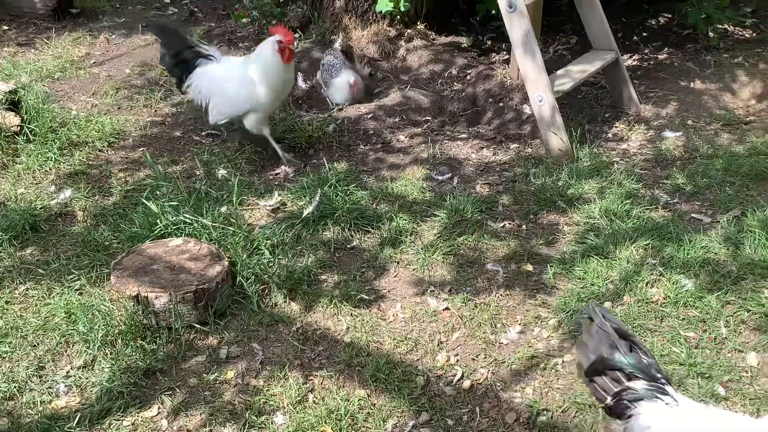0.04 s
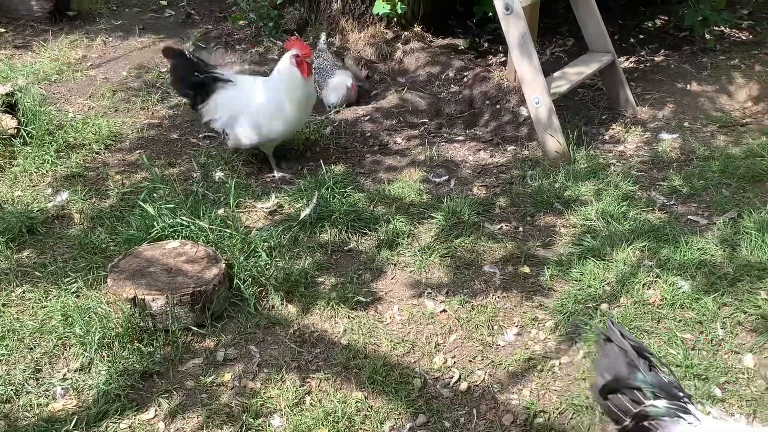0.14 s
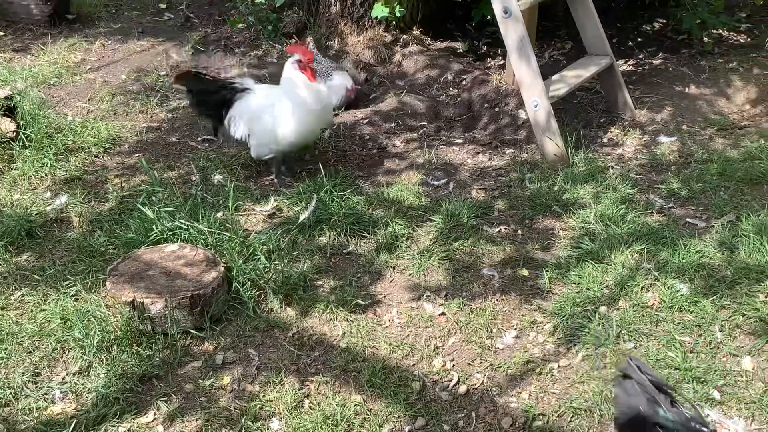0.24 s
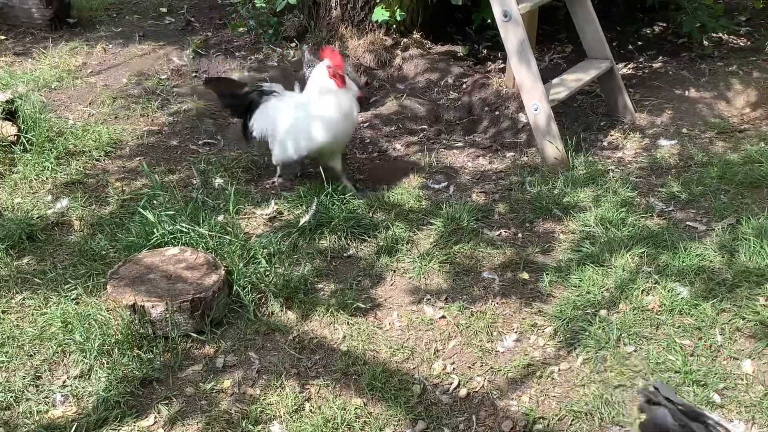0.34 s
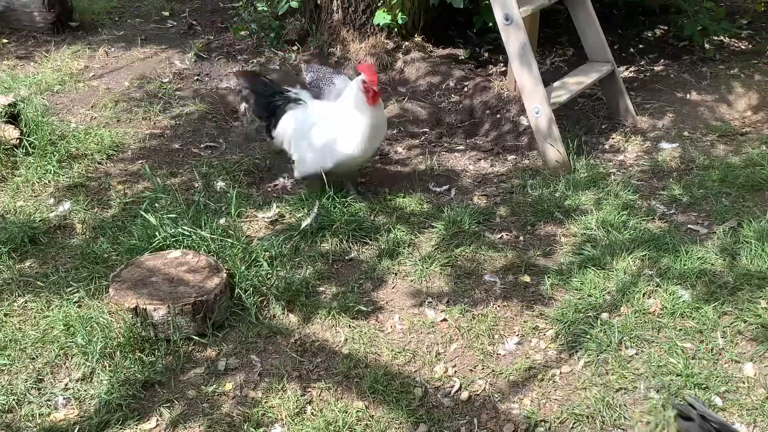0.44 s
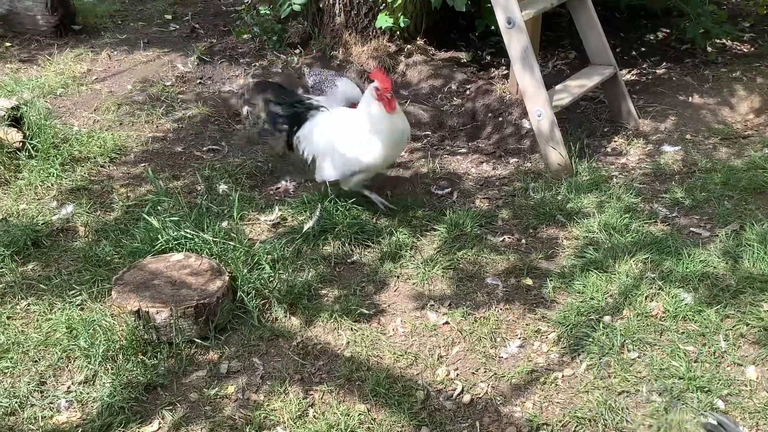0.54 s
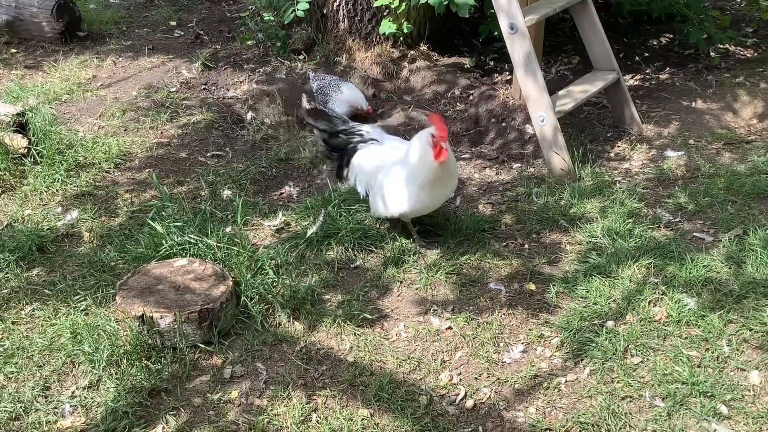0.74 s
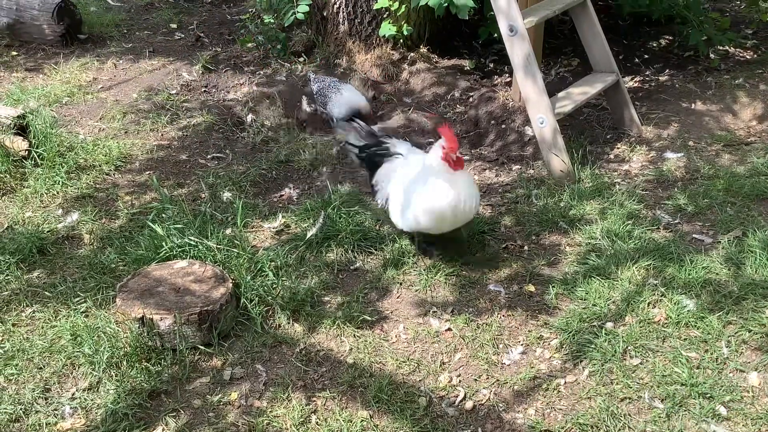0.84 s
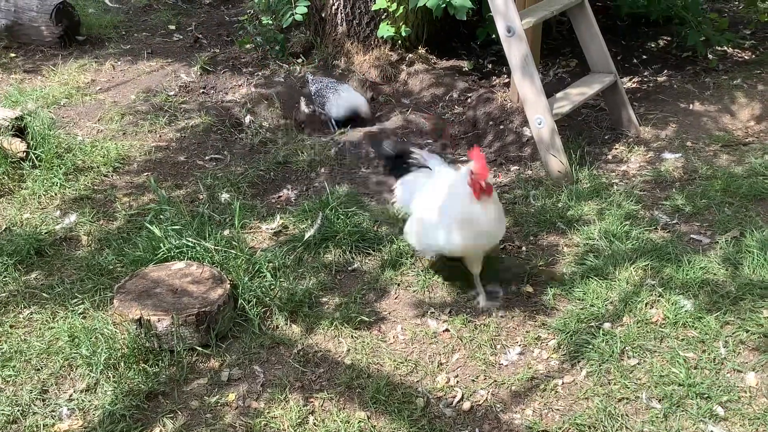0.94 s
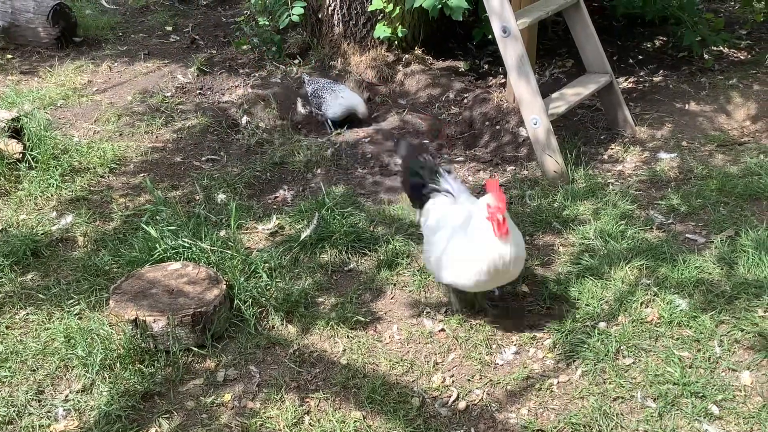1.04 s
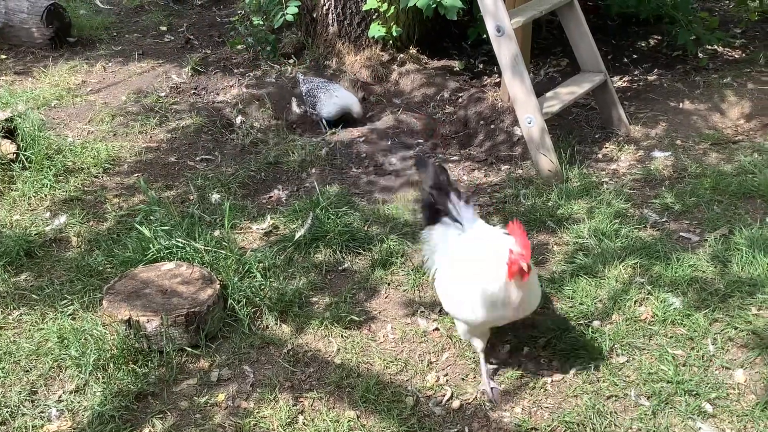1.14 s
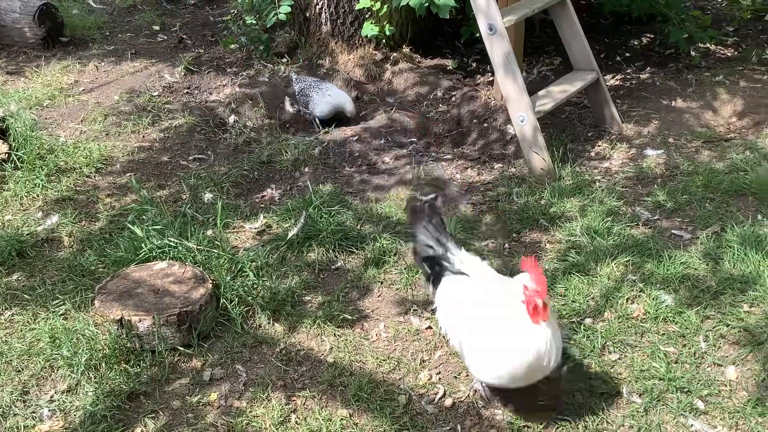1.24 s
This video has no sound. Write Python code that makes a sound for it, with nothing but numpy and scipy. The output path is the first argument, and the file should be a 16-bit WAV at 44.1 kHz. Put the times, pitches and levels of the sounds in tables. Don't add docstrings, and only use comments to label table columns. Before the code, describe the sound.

Chickens clucking in a grass pen. A soft cluck at 0.08 s, then a near hen's loud raspy squawks at 0.19, 0.37 and 0.57 s, the first longest and brightest, the last very short and muffled. Quiet clucks follow at 0.65, 0.81, 0.89, 1.10 and 1.28 s. Leaves crackle faintly near 1.0 s; a distant hen calls at 1.25 s. Faint hum, hiss and late-rising traffic rumble lie beneath, with short dull echoes.

```python
import sys
import numpy as np
from scipy import signal
from scipy.io import wavfile
from scipy.ndimage import uniform_filter1d

SR = 44100
rng = np.random.default_rng(int(sys.argv[2]) if len(sys.argv) > 2 else 0)


def to_linear_factor(level_db):
    exponent = np.asarray(level_db, float) / 20
    return 10 ** exponent


def store_pcm(level_fs):
    pcm = np.round(np.clip(level_fs, -1, 1) * 32767).astype(np.int16)
    wavfile.write(sys.argv[1], SR, np.atleast_2d(pcm).T)


N = 57330
LEAD = 4410


def butterworth(x, order, hz, kind):
    return signal.sosfilt(signal.butter(order, hz, kind, fs=SR, output="sos"), x)


def wander(rate_hz):
    x = butterworth(rng.standard_normal(N + 4000), 2, rate_hz, "low")[4000:]
    return x / x.std()


def resonance(x, hz, width_hz):
    r = np.exp(-np.pi * width_hz / SR)
    zeros = np.array([1, 0, -1]) * (1 - r * r) / 2
    poles = [1, -2 * r * np.cos(2 * np.pi * hz / SR), r * r]
    return signal.lfilter(zeros, poles, x)


def syrinx(pitch, rough):
    n = len(pitch)
    beat = 2 * np.pi * np.cumsum(pitch) / SR
    phase = beat + 0.65 * rough * wander(450)[:n]
    k = np.arange(1, 40)[:, None]
    below_top = np.clip((16000 - k * pitch) / 4000, 0, 1)
    pulses = np.sum(np.cos(k * phase + 0.06 * k ** 2) * below_top, axis=0)
    half_rate = 0.7 * np.cos(beat / 2) * (1 + 0.56 * wander(69)[:n])
    shimmer = 0.3 * wander(424)[:n]
    breath = 3.6 * rng.standard_normal(n) * (1 + 0.5 * np.cos(beat))
    return pulses * (1 + rough * (half_rate + shimmer)), breath


def upper_throat(source, breath, rough, throat):
    n, out = len(source), 0
    airy_above_hz, flicker_db, flicker_hz = 4500, 8, 45
    for i, (hz, width_hz, db) in enumerate(throat):
        gain = (-1) ** i * to_linear_factor(db + flicker_db * rough * wander(flicker_hz)[:n])
        excitation = source + (rough + 0.24) * min(hz / airy_above_hz, 1) * breath
        ringing = resonance(resonance(excitation, hz, width_hz), hz, 1.086 * width_hz)
        out = out + gain * ringing
    return out


def voice(rows, pipe_hz, mouth_hz, mouth_db, bright_db, throat, width_hz=370):
    s, *columns = np.transpose(rows)
    a, b = int((s[0] - 0.02) * SR), min(int((s[-1] + 0.01) * SR), N)
    t = np.arange(a, b) / SR
    pitch, db, rough = [np.interp(t, s, c) for c in columns]
    rough = np.clip(rough, 0, 1)
    source, breath = syrinx(pitch, rough)
    windpipe = resonance(source, pipe_hz, width_hz)
    mouth = to_linear_factor(mouth_db) * resonance(source, mouth_hz, width_hz)
    low = butterworth(windpipe - mouth, 6, 1.216 * mouth_hz, "low")
    beak = to_linear_factor(bright_db) * (pitch / pitch.max()) ** 4.54
    x = low + beak * upper_throat(source, breath, rough, throat)
    x = butterworth(x, 2, 220, "high")
    power = uniform_filter1d(uniform_filter1d(x ** 2, size=300), size=300)
    x = x / np.sqrt(power + 1e-9)
    onset = np.clip((t - s[0]) / 0.002 + 1, 0, 1)
    release = np.clip((s[-1] - t) / 0.003 + 1, 0, 1)
    out = np.zeros(N + LEAD)
    out[a + LEAD:b + LEAD] = x * to_linear_factor(db) * onset * release
    return out


# (t/s, f/Hz, level/dB, roughness/0-1)
FIRST_SQUAWK = [(0.187, 595.2, -54, 0.7), (0.193, 576, -35, 0.54), (0.201, 574.3, -25, 0.64),
                (0.215, 735.6, -22.5, 0.4), (0.235, 780, -21, 0.5), (0.255, 746.7, -19, 0.53),
                (0.265, 670.3, -22, 0.04), (0.274, 646, -30, 0)]
SECOND_SQUAWK = [(.373, 457, -48, .25), (0.38, 491, -30.5, 0.27), (.388, 591.4, -28, 0.037),
                 (0.394, 653.8, -25.5, 0.043), (0.415, 682, -23, 0.14), (0.432, 694.8, -23, 0.14),
                 (0.437, 657.7, -21, 0.17), (0.449, 657, -37.5, 0.21)]
THIRD_SQUAWK = [(.567, 389.5, -46, 0.47), (0.574, 425.2, -31.5, 0.37), (0.581, 474.7, -22.5, .05),
                (0.588, 524.2, -23, 0.14), (0.595, 491.6, -21, 0.3), (0.599, 492, -28.5, 0.66),
                (0.609, 489, -36.5, 0.52), (.612, 460, -63.5, 0.59)]
# (windpipe f/Hz, mouth f/Hz, mouth level/dB, brightness level/dB)
SQUAWK_TRACTS = [
    (764, 1086, -1.5, -8),
    (639, 987, -0.5, -8.5),
    (610, 1024, 6.5, -2.5),
]
# (f/Hz, width/Hz, level/dB)
OPEN_THROAT = [(1438, 305, -3), (2112, 320, -9), (2589, 275, -2.5), (3780, 1800, -18.5), (4700, 144, -12.5),
               (6065, 860, -22), (7560, 950, -26), (9370, 1600, -26.5), (15000, 1300, -50.5)]
HALF_SHUT_THROAT = [(1420, 300, -25.5), (1900, 700, -16), (2954, 526, -12), (4500, 570, -33.5),
                    (7010, 1600, -35.5), (9750, 3300, -50), (15000, 1500, -57)]


def squawks():
    contours = FIRST_SQUAWK, SECOND_SQUAWK, THIRD_SQUAWK
    throats = OPEN_THROAT, OPEN_THROAT, HALF_SHUT_THROAT
    return sum(voice(rows, *tract, throat) for rows, tract, throat in zip(contours, SQUAWK_TRACTS, throats))


# (start t/s, length t/s, start f/Hz, end f/Hz, level/dB)
WHISTLES = [
    (0.187, 0.012, 1257, 600, -36.5),
    (0.195, 0.052, 1222, 1126, -33.5),
    (.365, 0.011, 1056, 490, -41),
    (0.409, .042, 926, 900, -43),
    (.584, 0.029, 545.6, 609.7, -30),
]


def second_syrinx_side():
    t, out = (np.arange(N + LEAD) - LEAD) / SR, 0
    for s, length, start_hz, end_hz, db in WHISTLES:
        u = np.clip((t - s) / length, 0, 1)
        hz = start_hz * (end_hz / start_hz) ** np.sqrt(u)
        jitter = 0.4 * np.pad(wander(230), (LEAD, 0))
        phase = 2 * np.pi * np.cumsum(hz) / SR + jitter
        out = out + to_linear_factor(db + 3) * np.sin(np.pi * u) ** 0.7 * np.sin(phase)
    return out


# (start t/s, length t/s, level/dB, top f/Hz, mouth f/Hz)
SOFT_CLUCKS = [
    (-.038, 0.0412, -45, 449.5, 1190),
    (0.075, 0.041, -30.5, 445.8, 948),
    (0.651, 0.045, -43.5, 436.7, 1330),
    (0.889, 0.035, -40, 455, 1300),
    (1.097, .038, -39.5, 462.2, 1300),
    (1.275, 0.069, -49.5, 411, 900),
]
# (f/Hz, width/Hz, level/dB)
SOFT_THROAT = [(1735, 190, -16), (2090, 550, -20.5), (2720, 440, -20), (3560, 620, -20), (5150, 660, -24),
               (8600, 1900, -32.5)]


def soft_clucks():
    out, edge_s, rough = 0, 0.003, 0.18
    for s, length, db, hz, mouth_hz in SOFT_CLUCKS:
        low_hz, end = hz * 0.66, s + length
        rows = [(s - edge_s / 2, low_hz, db - 24, rough),
                (s + edge_s, low_hz * 1.05, db - 10, rough),
                (s + 0.55 * length, hz * 0.985, db - 3, rough),
                (s + 0.78 * length, hz, db, rough),
                (end - edge_s, hz * 0.94, db - 2, rough),
                (end + edge_s, hz * 0.88, db - 24, rough)]
        bright_db = 19.5 * np.log2(mouth_hz / 1300)
        out = out + voice(rows, 565, mouth_hz, 2.5, bright_db, SOFT_THROAT)
    return out


# (t/s, f/Hz, level/dB, roughness/0-1)
FALLING_CLUCK = [(.806, 311.8, -66, 0.1), (.811, 296, -40, 0.12), (.822, 264.5, -36.5, 0.13),
                 (.827, 248, -48.5, .05), (.832, 242, -67, 0)]


def low_cluck():
    return voice(FALLING_CLUCK, pipe_hz=530, mouth_hz=1110, mouth_db=1, bright_db=-28,
                 throat=SOFT_THROAT, width_hz=100)


# (t/s, f/Hz, level/dB, roughness/0-1)
DISTANT_CALL = [(1.251, 639, -62.5, 0.47), (1.255, 771, -58, 0.2), (1.265, 806, -50.5, 0.33),
                (1.28, 784, -62, 0.6), (1.3, 720, -52.5, 0.6)]


def far_hen():
    return voice(DISTANT_CALL, pipe_hz=800, mouth_hz=1470, mouth_db=4.5, bright_db=-10, throat=OPEN_THROAT)


# (delay t/s, level/dB)
REFLECTIONS = [
    (0.014, -14),
    (0.034, -15.5),
    (0.049, -24),
    (.072, -29.5),
    (0.096, -33.5),
]


def yard(x):
    t = np.arange(int(0.5 * SR)) / SR
    tail_db, t60_s, smear_s = -20, 0.29, 0.0035
    scatter = rng.standard_normal((2, len(t)))
    response = to_linear_factor(tail_db - 60 * t / t60_s) * scatter[0] * (t > 0.008) * 0.04
    for s, db in REFLECTIONS:
        cluster = scatter[1] * (t > s) * np.exp(-np.abs(t - s) / smear_s)
        response += to_linear_factor(db) * cluster / np.sqrt(np.sum(cluster ** 2))
    return butterworth(signal.fftconvolve(x, response)[:len(x)], 1, [450, 18000], "band")


# (start t/s, length t/s, level/dB, grain rate f/Hz)
LEAF_RUSTLES = [
    (.9877, .002, -52, 5000),
    (.99, .03, -73, 2500),
    (1.001, .008, -59, 3000),
    (1.277, .08, -76, 20000),
]


def leaves():
    t, draw = np.arange(N) / SR, rng.random(N)
    sizes = to_linear_factor(5.1 * np.minimum(rng.exponential(1, N), 3)) * rng.choice([-1, 1], N)
    grains = 0
    for s, length, db, rate in LEAF_RUSTLES:
        snaps = sizes * (draw < rate / SR) * (t > s)
        decay = np.maximum(t - s - length, 0) / 0.003 + np.clip((t - s) / length, 0, 1)
        grains = grains + to_linear_factor(db) * snaps * np.exp(-decay)
    return 3 * butterworth(grains, 3, [5200, 16000], "band")


# (t/s, level/dB, f/Hz)
FOOTFALLS = [
    (0.144, -44, 193),
    (1.166, -48.5, 354),
]


def footfalls():
    t, out = np.arange(N) / SR, 0
    for s, db, hz in FOOTFALLS:
        force = np.sin(np.pi * np.clip((t - s) / 0.0084, 0, 1)) ** 2
        out = out + to_linear_factor(db) * np.sin(2 * np.pi * hz * (t - s)) * force
    return out


# (f/Hz, spectral level/dB)
HUM_SPECTRUM = [(45, -59), (200, -4), (600, -9), (1300, -21), (2500, -21.5), (3400, -34.5), (7000, -35),
                (16000, -48.5)]


def garden():
    edges = 45 * 2 ** np.arange(0, 8.6, 0.5)
    white, hum = rng.standard_normal((2, N)), 0
    hz, db = np.transpose(HUM_SPECTRUM)
    for k, (low, high) in enumerate(zip(edges, edges[1:])):
        band = butterworth(white[k % 2], 2, [low, high], "band")
        band_db = np.interp(np.log(low * high) / 2, np.log(hz), db)
        hum = hum + band * to_linear_factor(band_db + 2 * wander(10))
    insects = resonance(resonance(white[0], 9500, 1100), 9500, 1100)
    hiss = to_linear_factor(-81.5 + 0.83 * wander(40)) * insects / insects.std()
    return to_linear_factor(-63) * hum / hum.std() + hiss


# (t/s, level/dB)
TRAFFIC_SWELL = [
    (0, -68),
    (.126, -62),
    (.23, -63.5),
    (.33, -74),
    (.8, -70.5),
    (1.2, -64.5),
    (1.3, -56.5),
]


def traffic():
    s, db = np.transpose(TRAFFIC_SWELL)
    rumble = butterworth(rng.standard_normal(N), 2, [55, 150], "band")
    return to_linear_factor(np.interp(np.arange(N) / SR, s, db)) * rumble / rumble.std()


def scene():
    hens = squawks() + second_syrinx_side() + soft_clucks() + low_cluck() + far_hen()
    in_yard = (hens + yard(hens))[LEAD:]
    return (in_yard + leaves() + footfalls() + garden() + traffic())[None]


def top_cut(x):
    return signal.sosfilt(signal.butter(12, 16500, fs=SR, output="sos"), x)


def record(dry):
    mix = butterworth(dry, 4, 65, "high")
    return top_cut(mix)


dry = scene()
out = record(dry)
store_pcm(out)
```